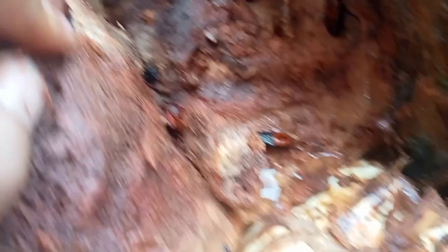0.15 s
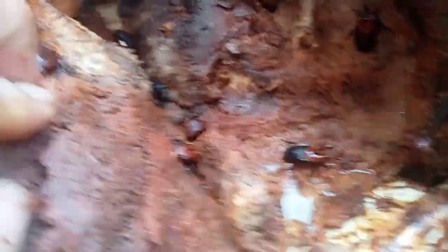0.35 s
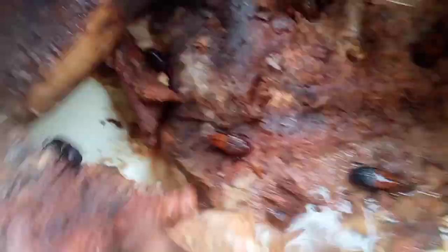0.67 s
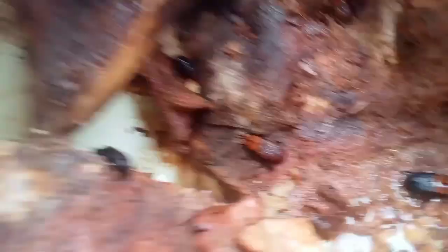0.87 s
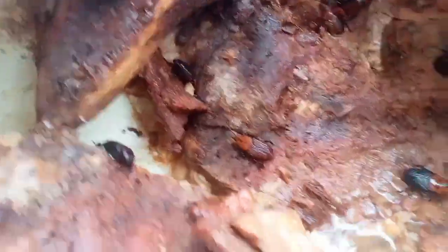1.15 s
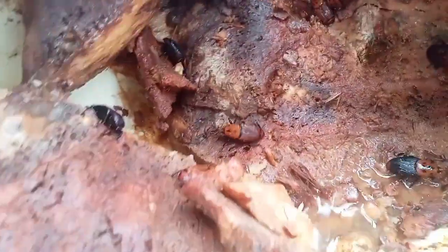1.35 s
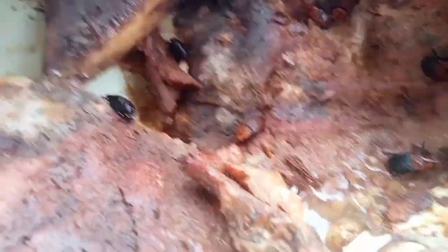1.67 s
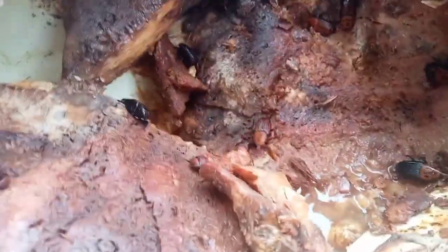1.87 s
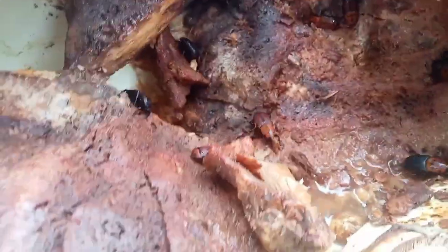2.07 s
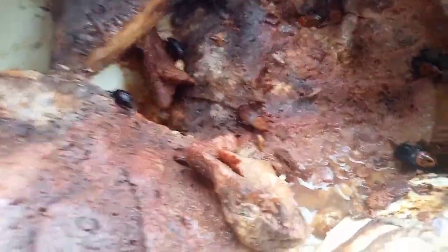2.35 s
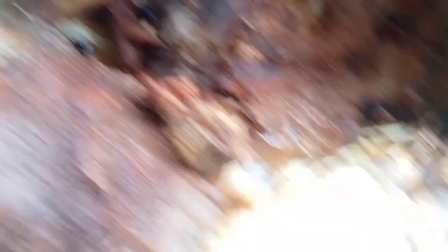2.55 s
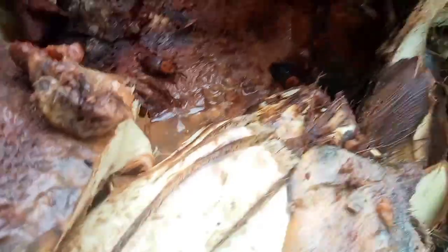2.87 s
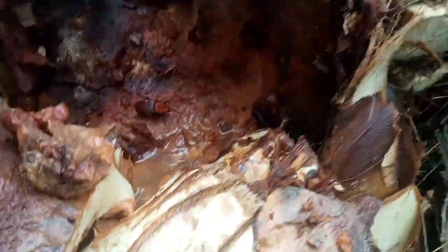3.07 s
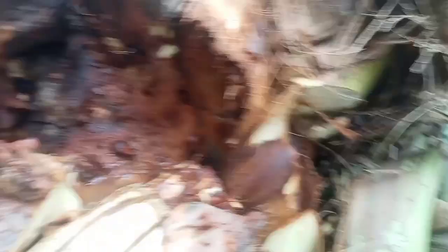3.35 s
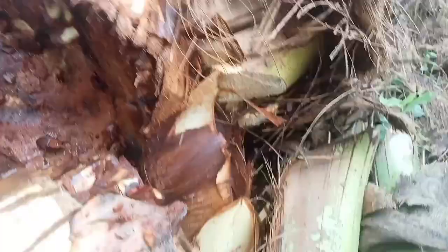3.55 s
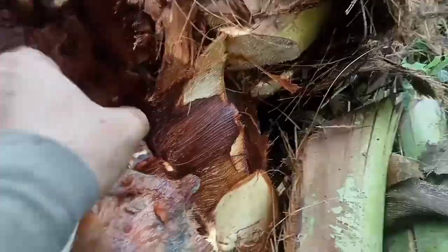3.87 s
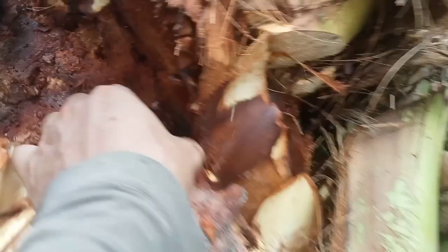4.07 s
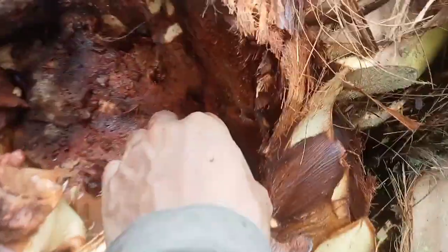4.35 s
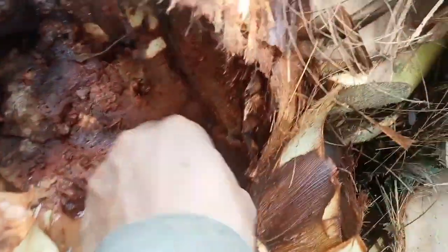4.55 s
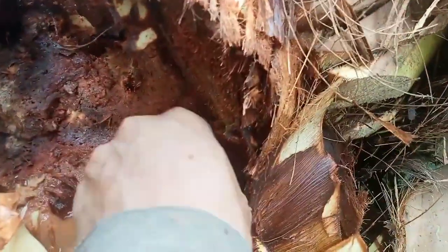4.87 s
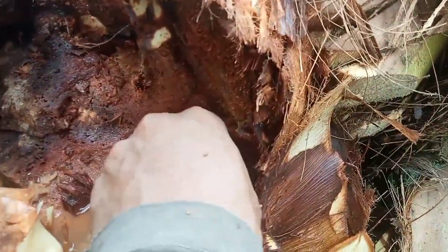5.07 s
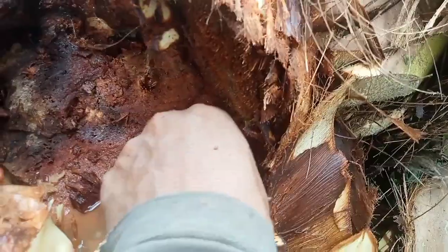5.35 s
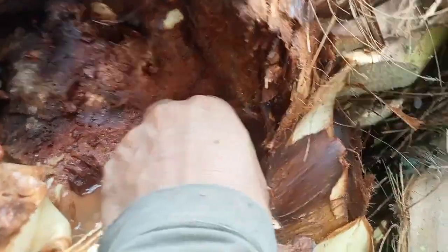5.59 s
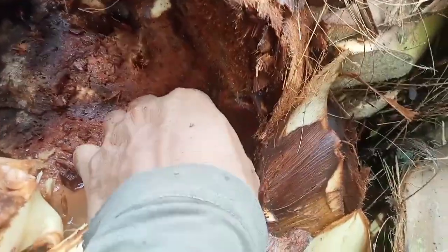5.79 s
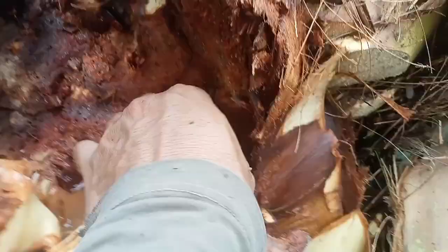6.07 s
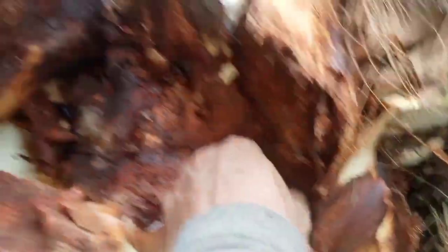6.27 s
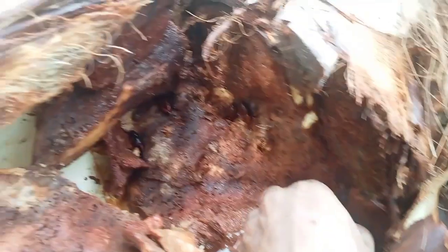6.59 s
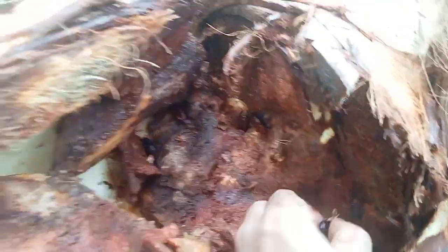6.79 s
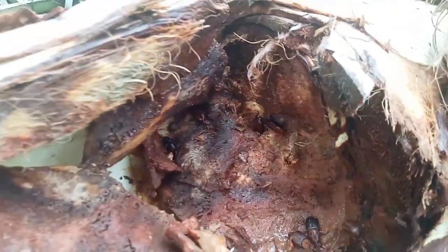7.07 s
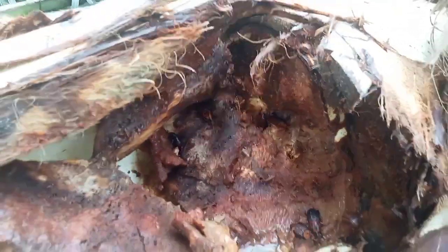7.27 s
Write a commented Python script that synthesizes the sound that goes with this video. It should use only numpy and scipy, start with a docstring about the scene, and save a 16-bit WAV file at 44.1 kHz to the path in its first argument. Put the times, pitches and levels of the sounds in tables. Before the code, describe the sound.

Outdoors, faint insects chirr and pulse over soft low air. Near the microphone, wet fibres crackle, creak and snap, and damp lumps knock with smothered thuds. After a short lull a sleeve slides up and brushes the microphone, followed at once by the loudest cracks and a woody, hollow clatter. The rest is quieter: light taps, thin ticks, brief rustling and a last few bright snaps.

```python
"""Outdoors, insects chirr throughout as shaped noise and wavering tones over a low airy rumble.
A hand works wet, rotten fibre in a hollow palm trunk: tiny grains rustle, a short tear creaks in slips,
strands snap as bright noise bursts, and soggy lumps knock as low, quickly smothered tones.
Then a sleeve swishes nearer and brushes the microphone, and loud cracks break off a piece that tumbles
and rings the hollow. Lighter taps and snaps follow to the end; late on, a far bird whistles once."""
import sys
import numpy as np
from scipy import signal
from scipy.fft import rfft, irfft
from scipy.io import wavfile
from scipy.ndimage import uniform_filter1d

SR = 44100
rng = np.random.default_rng(int(sys.argv[2]) if len(sys.argv) > 2 else 0)


def wav_record(signal):
    """Record a signal, one row per channel, as 16-bit PCM in the file named by sys.argv[1]."""
    frames = np.transpose(np.atleast_2d(signal))
    bounded = np.clip(frames, -1, 1)
    # unit amplitude maps onto the largest positive 16-bit level
    quanta = np.round(bounded * 32767).astype(np.int16)
    wavfile.write(sys.argv[1], SR, quanta)


N = 327335
TIME = np.arange(N) / SR
FREQS = np.fft.rfftfreq(N, 1 / SR)

# colour of the outdoor air: (frequency [Hz], level [dB])
AIR_COLOUR = [(30, -17), (65, -3.5), (95, 6.5), (160, -0.5), (260, -7.5), (500, -14.5), (1000, -18.5),
              (2800, -15.5), (4000, -25), (6000, -68), (16000, -22)]

# bands of the far insects: (centre [Hz], width setting [Hz], middle level [dB])
INSECT_BANDS = [(2177, 190, -67), (2360, 2200, -77.5), (3460, 280, -66.5), (4730, 610, -61),
                (7150, 870, -63), (7200, 41, -70), (11400, 1600, -67.5)]
# colour of the nearest insect's rasp: (frequency [Hz], level [dB])
RASP_COLOUR = [(11500, -13.5), (13000, -29.5), (14200, 0.5), (15200, 6.5), (15600, 6.5), (16000, -3.5)]
# tempo of that rasp, nearly even but for one hesitation: (time [s], rate [strokes per s])
RASP_PACE = [(0, 4.8), (1.2, 4.85), (1.9, 5.17), (2.7, 4.8), (4.1, 4.78), (4.6, 3.9), (5.2, 4.65),
             (6.3, 4.82), (7.4, 4.76)]
RASP_STROKE_S = 0.081  # one stroke peaks at this moment
# loudest insects, singing in one narrow band: (time [s], level before swell and trim [dB])
CHORUS_LEVEL = [(0.0, -54), (7.11, -57.5), (7.4, -54)]
CHORUS_LOW_HZ, CHORUS_HIGH_HZ = 4720, 5133

# a faint bird whistle that falls: (time [s], pitch [Hz], level [dB])
BIRD_WHISTLE = [(6.27, 6360, -72), (6.35, 6030, -66), (6.41, 6060, -71), (6.47, 6000, -66),
                (6.52, 5520, -66)]

# cloth sliding nearer: (frequency [Hz], level [dB])
CLOTH_COLOUR = [(500, -8), (1050, -10.5), (1500, -3), (2500, -1.5), (4200, -20), (7100, 0.5),
                (10000, -17.5)]
SLIDE_START_S, SLIDE_LENGTH_S = 2.85, 0.47
SLIDE_DB, SLIDE_SWELL_DB = -54, 12  # level halfway, and the rise from start to end
# a sleeve brushing past the microphone: (frequency [Hz], level [dB])
SLEEVE_COLOUR = [(200, -8), (1000, -21.5), (2500, -13.5), (5500, -13), (7000, -0.5), (8500, -12),
                 (10000, -19), (12500, -11), (14300, -2), (15500, -3)]
BRUSH_START_S, BRUSH_LENGTH_S, BRUSH_DB = 3.331, 0.046, -32.5  # level halfway
# handling bumps: (time [s], level [dB], pitch [Hz], length [s])
HANDLING_BUMPS = [(3.333, -39, 92, 0.024), (3.484, -37.5, 78.2, 0.028), (3.504, -43, 97, 0.034)]

# ringing tones (modes) of the hollow trunk: (pitch [Hz], level [dB], 60 dB fade before damping [s])
HOLLOW_MODES = [(303.8, -1.5, 0.076), (749, -13, 0.066), (784, -13, 0.045), (935, -10.5, 0.1),
                (1200, -15, 0.042), (1380, -17, 0.05), (1510, -18, 0.065), (1780, -9, 0.019),
                (2070, -21, 0.081), (2280, -12.5, .04), (2532, -14, .075)]
# the dead clack of the contact itself: (pitch [Hz], level [dB], 60 dB fade [s])
CLACK_MODES = [(880, -7, 0.013), (1920, 9, 0.0033)]
# loose pieces and fingers knocking on the trunk: (time [s], strength [dB], hardness [Hz])
TRUNK_BLOWS = [(3.6509, -9.5, 3100), (3.7912, -16, 2340), (3.7992, -29.5, 2640), (3.8249, -16, 1830),
               (3.8305, -23.5, 1780), (3.886, -35, 2400), (3.9039, -31, 1320), (3.9109, -29.5, 2490),
               (3.936, -34.5, 1890), (3.98, -43.5, 1900), (4.033, -39.5, 720), (4.054, -34.5, 1080),
               (4.094, -34, 1080), (4.109, -36, 1190), (4.155, -48, 1100), (4.243, -44, 690),
               (4.304, -45.5, 795), (5.148, -45.5, 910), (5.343, -48, 880), (5.506, -42, 1350),
               (5.674, -39, 1650), (5.7342, -43.5, 1530), (5.816, -42.5, 1095), (5.9634, -38.5, 990),
               (6.114, -47.5, 1970), (6.791, -46, 497), (6.827, -50, 1700), (6.887, -45, 490),
               (7.2061, -39, 1860), (7.248, -45, 1520), (7.358, -39, 1430)]
# crumbs and fingertips pattering inside the hollow: (start [s], length [s], strength [dB])
PATTER_BURSTS = [(3.897, 0.048, -44), (4.035, 0.096, -53), (4.15, 0.52, -69), (5.14, 0.076, -62),
                 (6.279, .18, -61), (6.6, 0.37, -67)]

# soggy lumps knocking: (time [s], level [dB], pitch [Hz], length [s])
LUMP_KNOCKS = [(.858, -20, 657, 0.011), (.8665, -23, 410, 0.022), (.9708, -29, 606, 0.0078),
               (.977, -37, 590, .007), (1.054, -36, 658, 0.011), (1.058, -18, 470, 0.013),
               (1.068, -33, 450, 0.0086), (1.1275, -27.5, 506, 0.02), (1.152, -28, 496, 0.014),
               (1.731, -34.5, 403, 0.014), (1.76, -37, 437, 0.011), (1.976, -24, 704, 0.011),
               (2.3775, -26, 495, 0.0076), (2.3815, -26.5, 620, 0.026), (2.4555, -27, 460, 0.019),
               (2.481, -29, 440, 0.0064), (2.489, -32.5, 614, 0.0056), (2.511, -38, 405, 0.0075),
               (2.694, -47.5, 283, 0.021)]

# colours of wet pulp, rubbed fibre and dry strands, one list each: (frequency [Hz], level [dB])
TOUCH_COLOURS = [
    [(50, -11), (170, 4), (290, 3), (430, 11), (520, 5.5), (630, 7.5), (850, -7), (1800, -40.5)],
    [(450, -15), (950, -5.5), (1700, 5), (2500, 1.5), (4000, -2), (5500, -10), (7000, -19)],
    [(3000, -22), (5500, -5), (7100, 8.5), (8500, -4), (10000, -9), (13000, -20.5), (15500, -24.5)],
]
# strokes of the hand through the fibre, before each sound's own trim:
# (start [s], length [s], pressure [dB], wet pulp against pressure [dB], dry strands against pressure [dB])
HAND_STROKES = [(.135, 0.033, -53.5, -0.5, 0), (.288, 0.081, -44, -0.5, -1.5), (.54, 0.29, -54.5, -2, -1.5),
                (.66, 0.061, -46, 3, 1.5), (.75, 0.021, -55, 0, -12), (.81, 0.032, -53.5, 6.5, 2),
                (.92, 0.25, -65, 5, 5), (1.33, 0.071, -75.5, 5.5, 24), (1.68, 0.11, -55, 5.5, -2),
                (1.815, 0.08, -49.5, 3, -2.5), (1.955, 0.03, -46, 6, -6.5), (2.06, 0.047, -53.5, 1.5, -6),
                (2.2, 0.334, -58, 2, -2), (2.345, 0.058, -53, 10.5, -6), (2.448, 0.049, -51, 2, -7),
                (2.495, 0.03, -55.5, 9, 8.5), (3.66, 0.17, -53.5, -7, 5.5), (4.07, 0.05, -53.5, -24, -1.5),
                (4.56, 0.034, -47.5, -22, -1), (6.28, 0.17, -56.5, -8.5, -0.5),
                (6.655, 0.027, -58, -19, -21), (7.34, 0.092, -56.5, -8, 1)]
# the hand's long, faint touch on the fibre, under and between the strokes:
# (start [s], length [s], pressure [dB])
FAINT_TOUCHES = [(0, 1.43, -67), (2.026, 1.03, -69.5), (3.54, 1.23, -65.5), (6.045, 0.85, -68),
                 (7.197, 0.29, -63.5)]
FAINT_WET_DB, FAINT_DRY_DB = -4, 0.5  # both against the pressure
PRESS_S, LET_GO_S = 0.0089, 0.015  # a stroke builds quickly, and the fibre settles after it

# a fibre bundle tears in slips that grow with the strain and slow just before it gives
TEAR_START_S, SLIP_GAP_S = 0.281, 0.011  # the gap is the first one
SLIP_STALL, STALL_POWER = 0.42, 5  # the last gap is longer by this share; a high power stretches late
TEAR_DB, STRAIN_SLIPS = -22, 5.1  # gain the slips approach, and how many slips the growth takes
# modes of the strained slab: (pitch [Hz], level [dB], 60 dB fade [s], swell [s])
SLAB_MODES = [(562, -6, 0.043, 0.00071), (1145, -1, 0.025, 0.001), (1750, 0, 0.022, 0.00045),
              (2400, 2.5, 0.014, 0.001), (6440, -5, .003, 0.000071), (7280, 1, 0.0081, 0.00012)]
# the slab bends: treble runs through it fastest, so each slip arrives as a falling chirp
BEND_DB, BEND_TOP_HZ, BEND_END_HZ, BEND_S = 1, 4800, 1100, 0.00446

# hair-fine strands parting: (time [s], strength [dB])
HAIR_TICKS = [(.101, -38), (0.3464, -28.5), (6.2245, -39.5), (6.404, -42), (7.353, -43.5)]
# colour of those ticks: (frequency [Hz], level [dB])
TICK_COLOUR = [(2000, -36), (6000, -8), (8000, 2.5), (10000, -7), (12500, -4), (15000, 0)]
HAIR_T60_S = 0.012

# fibres snapping and bits landing: (time [s], strength [dB], the piece's own pitch [Hz],
# brightness of tick over crack [dB], heft of the wet mass behind it against the strength [dB])
FIBRE_SNAPS = [(0.0916, -27, 7100, 21.5, -43), (0.1359, -42.5, 640, -11, -6),
               (0.1431, -27, 6950, 38, -11.5), (0.21, -38, 6600, 12, -41), (.3843, -24, 6800, 29, -38),
               (0.6674, -19, 2250, 5, -18.5), (0.6757, -13.5, 6880, 9.5, -41),
               (0.6776, -16, 970, -4.5, -8.5), (0.689, -27.5, 982, 6, -4.5), (.702, -32.5, 1604, -9.5, -26),
               (.735, -13.5, 1620, 5.5, -16.5), (0.771, -38, 1933, -13, -14),
               (0.8113, -31.5, 6560, 13, -11), (0.8238, -35.5, 6780, 9, -12.5),
               (0.8689, -31, 2100, -9, 11.5), (1.056, -40, 2000, 31, 3), (1.316, -52.5, 1140, -10, 5.5),
               (1.8721, -45, 1250, -3, 0), (1.882, -41.5, 1680, -2, -6), (1.9355, -36.5, 675, 6, -4),
               (1.9737, -36.5, 1230, 7, 3), (1.978, -37, 1580, -5, -8), (2.1317, -49.5, 613, -8, 11),
               (2.367, -39, 2400, 6, -17), (2.417, -47, 2700, 11, 5), (2.4555, -42, 1890, 0, 10),
               (2.463, -37, 2390, 4, 4.5), (3.6345, -9.5, 4340, 17.5, -25), (3.65, -8.5, 2450, 2.5, -20),
               (3.6535, -18.5, 1700, -7, -32.5), (3.6602, -22, 7400, 11, -35.5),
               (3.674, -19.5, 7390, 27, -29.5), (3.752, -26.5, 4730, 20, -29), (3.774, -29.5, 4170, 10, -5),
               (4.5807, -27.5, 6860, 34, -10), (4.632, -26.5, 7900, 22.5, -17.5),
               (4.6466, -40, 1350, -7, -24), (4.8081, -35, 7000, 30, -26), (5.6747, -30, 1270, 8, -7.5),
               (6.1722, -47.5, 2110, -10, -5), (6.2215, -21.5, 3300, 22.5, -46),
               (6.2592, -27.5, 1750, 9, -23), (6.29, -40.5, 2050, 1, 3), (6.35, -40.5, 2300, 9, -34),
               (6.436, -44.5, 2290, -9, -14), (7.353, -30, 5270, 29, -39), (7.3902, -19, 5750, 60, -46),
               (7.3954, -26.5, 5650, 42, -40)]
# limits of the snap's heft, crack, tick and fizz bands: (frequency [Hz])
SNAP_BAND_EDGES = [150, 900, 3000, 9000, 16000]
# colour of dry fibre close by: (frequency [Hz], level [dB])
FIBRE_COLOUR = [(60, -29.5), (150, -5.5), (330, -7), (480, -10), (730, 3.5), (970, 6), (1300, 5.5),
                (1750, 9), (2600, 3.5), (3200, -1), (4200, -4), (5400, -13.5), (7100, 10), (8800, 3),
                (12500, -4.5), (15000, 17.5)]
# thin strands sound higher and die sooner: the splintering time holds at SNAP_REF_HZ, less above it
SNAP_T60_S, SNAP_REF_HZ, SNAP_SHORTEN = 0.017, 1810, 0.11
# the topmost fizz against the snap's strength [dB]; a clean tick has less of it [dB per dB]
FIZZ_DB, FIZZ_PER_BRIGHTNESS = -21, -0.47

EDGE_HZ = 15600  # upper band limit


def amp(db):
    """Turns decibels into gain."""
    return 10 ** (np.asarray(db) / 20)


def unit(x):
    """Scales a sound to an average strength (rms) of 1."""
    return x / np.sqrt(np.mean(x ** 2) + 1e-20)


def read(points, hz):
    """Reads a colour between its points, on a log-frequency axis."""
    f, db = np.transpose(points)
    return np.interp(np.log(hz + 1), np.log(f), db)


def add(mix, s, sound):
    """Mixes a sound in at time s, in place."""
    part = mix[max(round(s * SR), 0):][:len(sound)]
    part += sound[:len(part)]


def tint(x, points):
    """Gives a full-length signal a colour, at rms 1."""
    return unit(irfft(rfft(x) * amp(read(points, FREQS)), N))


def drift(rate_hz):
    """Makes a random wander of rms 1 by joining random points with straight lines."""
    knots = rng.standard_normal(N // 30)
    return unit(np.interp(TIME * 2 * rate_hz, np.arange(len(knots)), knots))


def causal(gain):
    """Builds a filter with this gain whose sound starts sharply (minimum phase)."""
    both_sides = np.r_[gain, gain[-2:0:-1]]
    log_gain = np.log(np.maximum(both_sides, 1e-7))
    return np.exp(np.conj(signal.hilbert(log_gain)))[:len(gain)]


def gesture(start, length, attack, release):
    """Shapes one movement: a smooth attack, a hold, and a dying release."""
    out, t = np.zeros(N), np.arange(0, length + 10 * release, 1 / SR)
    rise = 1 - np.exp(-(t / attack) ** 2)
    fall = np.exp(-np.maximum(t - length, 0) / release)
    add(out, start, rise * fall)
    return out


def struck(modes_hz, gains, t60s, t):
    """A blow sets several tones ringing at once, each fading at its own speed."""
    modes = zip(modes_hz, gains, t60s)
    return sum(gain * amp(-60 * t / t60) * np.sin(2 * np.pi * hz * t) for hz, gain, t60 in modes)


def air(level_db=-59.5, swell_db=1):
    """Outdoor air is gently swelling noise: a low rumble and faint hiss."""
    return tint(rng.standard_normal(N), AIR_COLOUR) * amp(level_db + swell_db * drift(12))


def insects(waver_db=0.24, flutter_db=1.9, rasp_db=-56, rest_db=-13):
    """Many far insects blur into bands of noise; a near one rasps in strokes, very high."""
    out = np.zeros(N)
    for hz, width, db in INSECT_BANDS:
        band = (1 + ((FREQS - hz) / width) ** 2 * 1.73) ** -1.5
        song = unit(irfft(rfft(rng.standard_normal(N)) * band, N))
        out += song * amp(db + waver_db * drift(1.4) + flutter_db * drift(30))
    beats = np.cumsum(np.interp(TIME, *np.transpose(RASP_PACE))) / SR
    beats -= np.interp(RASP_STROKE_S, TIME, beats)
    stroke = (0.5 + 0.5 * np.cos(2 * np.pi * beats)) ** 0.63
    rest = amp(rest_db)  # the rasp never falls fully silent between strokes
    rasp = tint(rng.standard_normal(N), RASP_COLOUR) * (rest + (1 - rest) * stroke)
    return out + rasp * amp(rasp_db + 1.2 * drift(0.8))


def chorus(count=9, jitter_hz=55, jitter_rate=190, flutter_db=3, flutter_rate=16, swell_db=2.5,
           trim_db=-2.73):
    """A few insects sing neighbouring, unsteady pitches; each flutters by itself while all swell together."""
    out = np.zeros(N)
    for hz in np.linspace(CHORUS_LOW_HZ, CHORUS_HIGH_HZ, count):
        turns = np.cumsum(hz + jitter_hz * drift(jitter_rate)) / SR
        out += amp(flutter_db * drift(flutter_rate)) * np.sin(2 * np.pi * turns)
    level_db = np.interp(TIME, *np.transpose(CHORUS_LEVEL))
    return unit(out) * amp(trim_db + swell_db * drift(4.5) + level_db)


def bird():
    """A thin, distant whistle is one pure tone gliding through its pitches."""
    s, hz, db = np.transpose(BIRD_WHISTLE)
    out, t = np.zeros(N), np.arange(s[0], s[-1], 1 / SR)
    tone = np.sin(2 * np.pi * np.cumsum(np.interp(t, s, hz)) / SR)
    soft_ends = signal.windows.tukey(len(t), 0.1)
    add(out, s[0], tone * amp(np.interp(t, s, db)) * soft_ends)
    return out


def slide(attack_s=0.018, release_s=0.025, grain_db=2):
    """Sliding cloth is a soft, finely grained swish that swells as it nears."""
    progress = np.clip((TIME - SLIDE_START_S) / SLIDE_LENGTH_S, 0, 1)
    level = amp(SLIDE_DB + SLIDE_SWELL_DB * (progress - 0.5) + drift(12))
    cloth = tint(rng.standard_normal(N) * amp(grain_db * drift(440)), CLOTH_COLOUR)
    return cloth * level * gesture(SLIDE_START_S, SLIDE_LENGTH_S, attack_s, release_s)


def brush(grain_db=2, attack_s=0.0018, release_s=0.0062, swell_db=9):
    """A brushing sleeve is a short, bright, grainy swish that builds until the cloth slips free."""
    swish = tint(rng.standard_normal(N) * amp(grain_db * drift(400)), SLEEVE_COLOUR)
    progress = np.clip((TIME - BRUSH_START_S) / BRUSH_LENGTH_S, 0, 1)
    level = amp(BRUSH_DB + swell_db * (progress - 0.5))
    return swish * level * gesture(BRUSH_START_S, BRUSH_LENGTH_S, attack_s, release_s)


def patter(taps_per_s=80, spread_db=4, soft_hz=1100, damped_t60=0.04):
    """Many tiny taps each briefly ring the hollow's modes while the hand damps them."""
    hz, mode_db, t60 = np.transpose(HOLLOW_MODES)
    softened = amp(mode_db) / np.hypot(1, hz / soft_hz)  # soft taps excite less treble
    ring = struck(hz, softened, np.minimum(t60, damped_t60), np.arange(SR // 5) / SR)
    ring = np.diff(ring)  # a light tap hardly pushes the air
    sizes = amp(spread_db * np.minimum(rng.exponential(1, N), 2))
    taps = sizes * rng.choice([-1, 1], N) * (rng.random(N) < taps_per_s / SR)
    touch = sum(amp(db) * gesture(s, length, PRESS_S, LET_GO_S) for s, length, db in PATTER_BURSTS)
    return signal.oaconvolve(unit(taps) * touch, ring / np.linalg.norm(ring))[:N]


def hollow(detune=0.0065, crunch_db=-15, crunch_t60=0.098, free_hz=2300, low_share=0.24):
    """Blows ring the trunk's cavity; soft ones reach only its lowest modes and damp the walls' ring."""
    out, t = np.zeros(N), np.arange(SR // 3) / SR
    hz, mode_db, t60 = np.transpose(HOLLOW_MODES)
    clack_hz, clack_db, clack_t60 = np.transpose(CLACK_MODES)
    clack = struck(clack_hz, amp(clack_db) * [1, -1], clack_t60, t)  # its two modes swing against each other
    gritty = signal.butter(2, [600, 3000], "band", fs=SR, output="sos")
    for s, db, hardness_hz in TRUNK_BLOWS:
        # the damped modes change with the spot struck
        wander = detune * rng.standard_normal(len(hz)) * np.sqrt(t60.min() / t60)
        # the lowest mode is the air's own and rings freely
        held = np.where(hz > hz[0], hardness_hz / free_hz, 1)
        ring = struck(hz * (1 + wander), amp(mode_db), t60 * held, t)
        grit = unit(signal.sosfilt(gritty, rng.standard_normal(len(t))))
        crunch = grit * amp(crunch_db - 60 * t / crunch_t60)
        top_hz = np.clip(hardness_hz, hz[0], SR / 3)  # harder contacts let more treble through
        band_hz = top_hz * np.array([min(low_share, 0.9), 1])
        contact = signal.butter(2, band_hz, "band", fs=SR, output="sos")
        add(out, s, amp(db) * signal.sosfilt(contact, clack + ring + crunch))
    return out


def knocks(rows, skew=0.72, roundness=2.2, wobble=0.075, upper_ratio=1.72, upper_db=-13):
    """In damped lumps a low, unsteady mode swells and is soon smothered; a higher one dies first."""
    out = np.zeros(N)
    for s, db, hz, length in rows:
        u = np.arange(0, length, 1 / SR) / length
        # the pulp yields unevenly
        give = unit(uniform_filter1d(rng.standard_normal(SR // 5), size=90))[:len(u)]
        angle = 2 * np.pi * np.cumsum(hz * (1 + wobble * give)) / SR
        upper = amp(upper_db) * (1 - u) ** 2 * np.sin(upper_ratio * angle)
        swell = abs(np.sin(np.pi * u ** skew)) ** roundness
        add(out, s, amp(db) * swell * (np.sin(angle) + upper))
    return out


def squelch(lumps, crackle_db=-21, pulp_db=-11, grains_per_s=900):
    """While a lump is squeezed, wet fibres crackle and ring small pockets in the pulp."""
    pulp_colour, fibre_colour = TOUCH_COLOURS[0], TOUCH_COLOURS[1]
    squeeze = np.sqrt(abs(uniform_filter1d(lumps ** 2, size=100)))
    grains = rng.standard_normal(N) * (rng.random(N) < grains_per_s / SR)
    fibres = amp(crackle_db) * tint(grains, fibre_colour)
    pockets = amp(pulp_db) * tint(grains, pulp_colour)
    return squeeze * (fibres + pockets)


def pressures():
    """The hand bears on wet pulp, rubbed fibre and dry strands; overlapping touches add as power."""
    touches = HAND_STROKES + [(*touch, FAINT_WET_DB, FAINT_DRY_DB) for touch in FAINT_TOUCHES]
    power = np.zeros((len(TOUCH_COLOURS), N))
    for s, length, db, wet_db, dry_db in touches:
        strengths = amp([db + wet_db, db, db + dry_db])
        power += np.outer(strengths ** 2, gesture(s, length, PRESS_S, LET_GO_S) ** 2)
    return np.sqrt(power)


def rustle(pressed, grains_per_s=1900, spread_db=4, clumps_per_s=85, clump_size=1.9, clump_s=0.0069,
           smooth=0.45, trim_db=-0.5):
    """Countless tiny slips of fibre lie over a smooth rubbing; one slip sets off a short clump of others."""
    sizes = amp(spread_db * np.minimum(rng.exponential(1, N), 3))
    slips = unit(sizes * rng.choice([-1, 1], N) * (rng.random(N) < grains_per_s / SR))
    starts = clump_size * rng.random(N) * (rng.random(N) < clumps_per_s / SR)
    clumps = 1 + signal.lfilter([1], [1, -np.exp(-1 / (clump_s * SR))], starts)
    out = np.zeros(N)
    for pressure, colour in zip(pressed, TOUCH_COLOURS):
        rubbing = smooth * rng.standard_normal(N)
        out += pressure * tint(clumps * (slips + rubbing), colour)
    return amp(trim_db) * out


def crackle(pressure, pops_per_s=140, low_hz=550, high_hz=3400, cycles=3, spread_db=1, trim_db=-4,
            count=16):
    """Small wet pops under the hand take one of several pitches and die within a few cycles."""
    out, t = np.zeros(N), np.arange(SR // 25) / SR
    sizes = amp(spread_db * np.minimum(rng.exponential(1, N), 3))
    pops = sizes * (rng.random(N) < pops_per_s / SR)
    which = rng.integers(0, count, N)
    for k, hz in enumerate(np.geomspace(low_hz, high_hz, count)):
        ring = np.sin(2 * np.pi * hz * t) * np.exp(-hz * t / cycles)
        out += signal.oaconvolve(pops * (which == k), ring)[:N]
    return amp(trim_db) * pressure * unit(out)


def ratchet(count=8):
    """Strain sets the times and gains of one tear's slips: they grow, and the last ones come slower."""
    gaps = SLIP_GAP_S * (1 + SLIP_STALL * np.linspace(0, 1, count - 1) ** STALL_POWER)
    times = TEAR_START_S + np.r_[0, np.cumsum(gaps)]
    gains = amp(TEAR_DB) * np.tanh((1 + np.arange(count)) / STRAIN_SLIPS)
    return zip(times, gains)


def tear(scrape=1.6, scrape_t60=0.011, fresh=0.35, detune=0.027, bend_skew=1.7):
    """Stick and slip: each release gives a similar scrape, a falling chirp and the slab's ringing modes."""
    out, t = np.zeros(N), np.arange(SR // 10) / SR
    dull = signal.butter(2, [800, 3600], "band", fs=SR, output="sos")
    grain = rng.standard_normal(len(t))  # every slip passes through the same slab
    u = np.minimum(t / BEND_S, 1)
    turns = np.cumsum(BEND_TOP_HZ * (BEND_END_HZ / BEND_TOP_HZ) ** u) / SR
    bend = amp(BEND_DB) * np.sin(np.pi * u ** bend_skew) * np.sin(2 * np.pi * turns)
    for s, gain in ratchet():
        texture = unit(grain + fresh * rng.standard_normal(len(t)))
        slip = bend + signal.sosfilt(dull, scrape * texture * amp(-60 * t / scrape_t60))
        for hz, mode_db, t60, swell in SLAB_MODES:
            tone = np.sin(2 * np.pi * hz * (1 + detune * rng.standard_normal()) * t)
            slip += amp(mode_db - 60 * t / t60) * (1 - np.exp(-(t / swell) ** 2)) * tone
        add(out, s, gain * slip)
    return out


def hairs(size=2048):
    """Each parting hair is a tiny, fading burst of noise high in the treble."""
    out, t = np.zeros(N), np.arange(size) / SR
    colour = causal(amp(read(TICK_COLOUR, np.fft.rfftfreq(size, 1 / SR))))
    for s, db in HAIR_TICKS:
        burst = rng.standard_normal(size) * amp(-60 * t / HAIR_T60_S)
        tick = irfft(rfft(burst) * colour)
        # strength is the rms its energy would have if spread over 10 ms
        add(out, s, amp(db) * tick * np.sqrt(SR / 100) / np.linalg.norm(tick))
    return out


def snaps(splinter=0.17, treble_share=0.87, tail=0.049, tail_t60=0.074, tail_hz=3500, ring=2.5,
          ring_width=0.072, size=8192):
    """Each snap is a sharp release and a short splintering, coloured by the piece that breaks."""
    out, t, hz = np.zeros(N), np.arange(size) / SR, np.fft.rfftfreq(size, 1 / SR)
    edges, fibre = np.array(SNAP_BAND_EDGES), amp(read(FIBRE_COLOUR, hz))
    centres, band = np.sqrt(edges[1:] * edges[:-1]), np.searchsorted(edges, hz)
    low = 1 / (1 + (hz / tail_hz) ** 4)  # wet fibre damps the treble first
    fade = np.cos(np.pi / 2 * t / t[-1]) ** 2
    for s, db, own_hz, bright_db, heft_db in FIBRE_SNAPS:
        t60 = SNAP_T60_S * (SNAP_REF_HZ / own_hz) ** SNAP_SHORTEN
        crack_db = -10 * np.log10(1 + amp(bright_db) ** 2)  # crack and tick share the snap's energy
        fizz_db = FIZZ_DB + FIZZ_PER_BRIGHTNESS * bright_db
        levels = db + np.array([heft_db, crack_db, crack_db + bright_db, fizz_db])
        noise = rng.standard_normal(size)
        slow = noise * (splinter * amp(-60 * t / t60) + tail * amp(-60 * t / tail_t60))
        fast = noise * splinter * amp(-60 * t / (t60 * treble_share))
        z = 1 + low * rfft(slow) + np.sqrt(1 - low ** 2) * rfft(fast)  # the 1 is the sharp release
        # narrow random resonances stay, the broad shape is even
        z /= np.sqrt(uniform_filter1d(abs(z) ** 2, size=200))
        colour = fibre * (1 + ring / (1 + ((hz / own_hz - 1) / ring_width) ** 2))
        # take out each band's own strength, counted over 10 ms, so that the levels set it
        band_power = np.bincount(band, colour ** 2)[1:-1] * 2 / size / (SR / 100)
        gain = colour * amp(read(np.c_[centres, levels - 10 * np.log10(band_power)], hz))
        add(out, s, fade * irfft(z * causal(gain)))
    return out


def scene():
    """The hand's work in the trunk, with the outdoors and the moving sleeve around it."""
    outdoors = air() + insects() + chorus() + bird()
    handling = slide() + brush() + knocks(HANDLING_BUMPS)
    lumps, pressed = knocks(LUMP_KNOCKS), pressures()
    trunk = patter() + hollow()
    pulp = lumps + squelch(lumps)
    fibre = rustle(pressed) + crackle(pressed[1]) + tear() + hairs() + snaps()
    return (outdoors + handling + trunk + pulp + fibre)[None]


def record(dry, ceiling=0.95):
    """The microphone rounds off the loudest cracks and loses the deepest bass; then the band limit."""
    rounded = ceiling * np.tanh(dry / ceiling)
    thinned = signal.sosfilt(signal.butter(3, 42, "high", fs=SR, output="sos"), rounded)
    band_limit = signal.firwin(511, EDGE_HZ, window=("kaiser", 9), fs=SR)
    return signal.oaconvolve(thinned, band_limit[None], "same")


dry = scene()
out = record(dry)
wav_record(out)
```